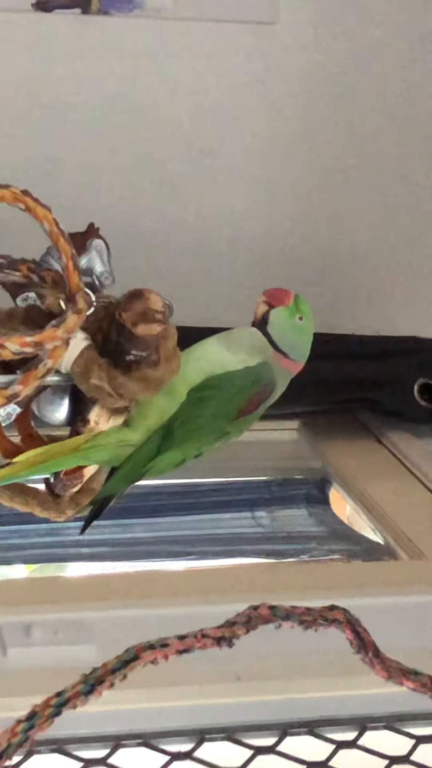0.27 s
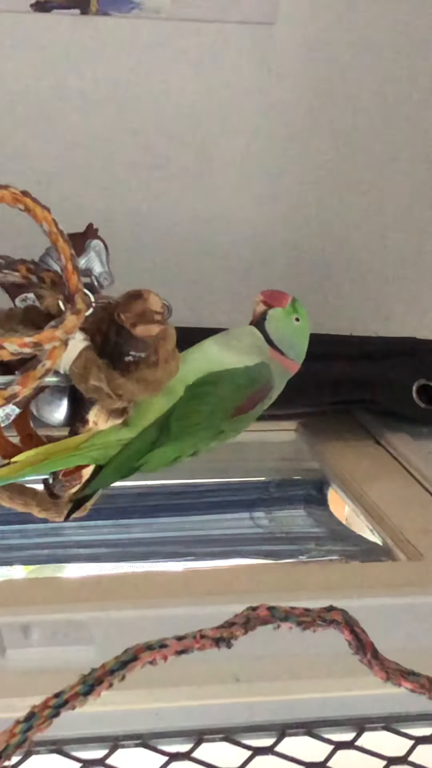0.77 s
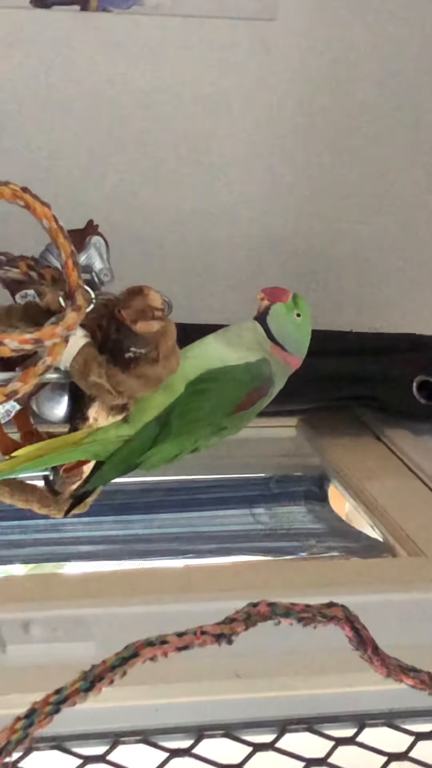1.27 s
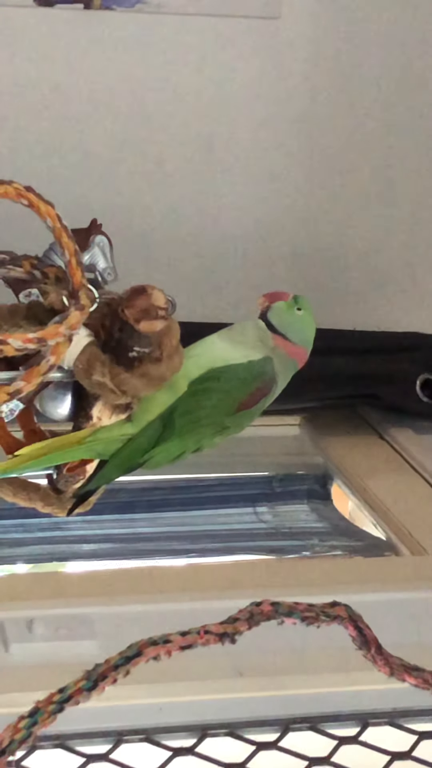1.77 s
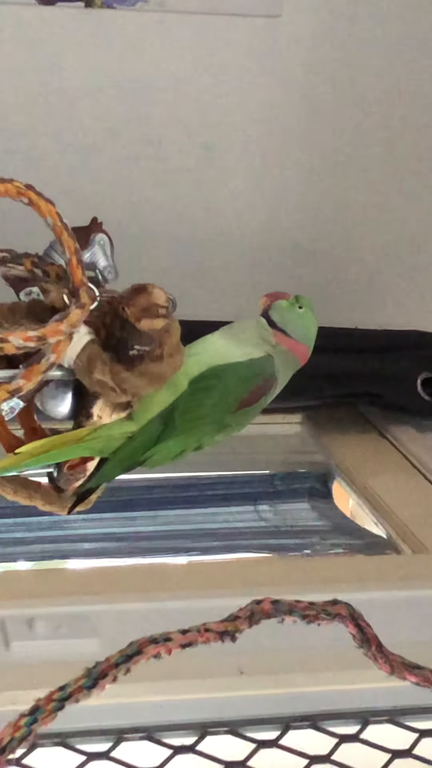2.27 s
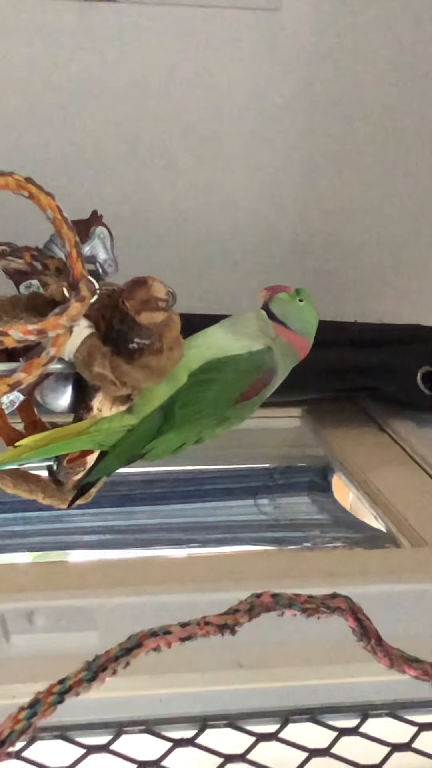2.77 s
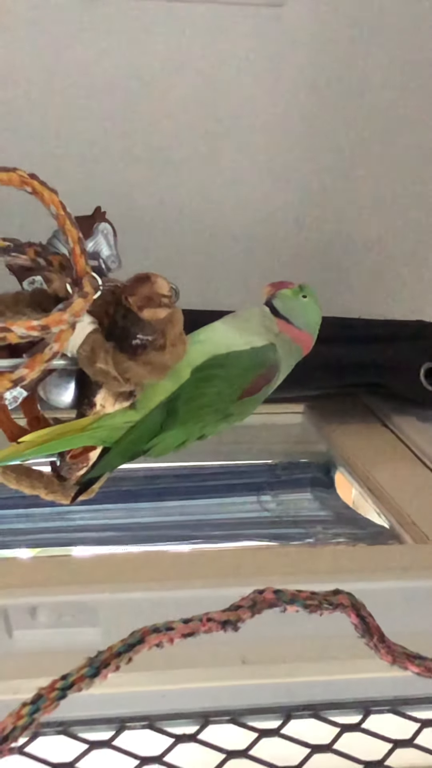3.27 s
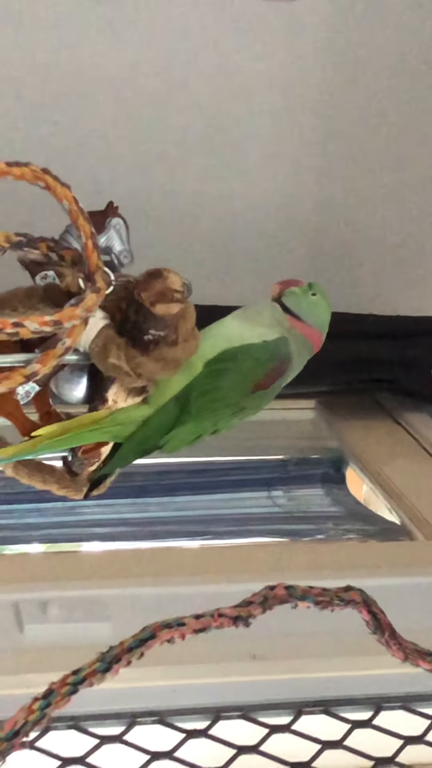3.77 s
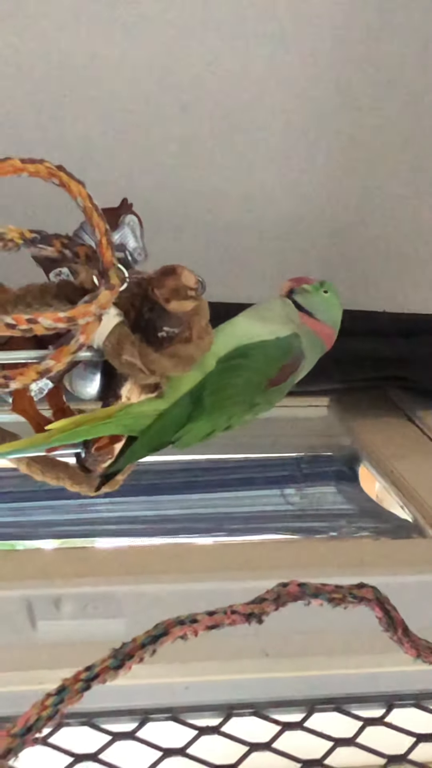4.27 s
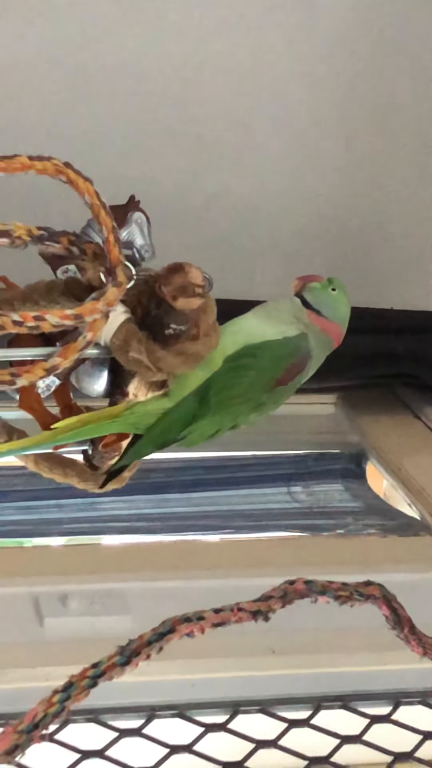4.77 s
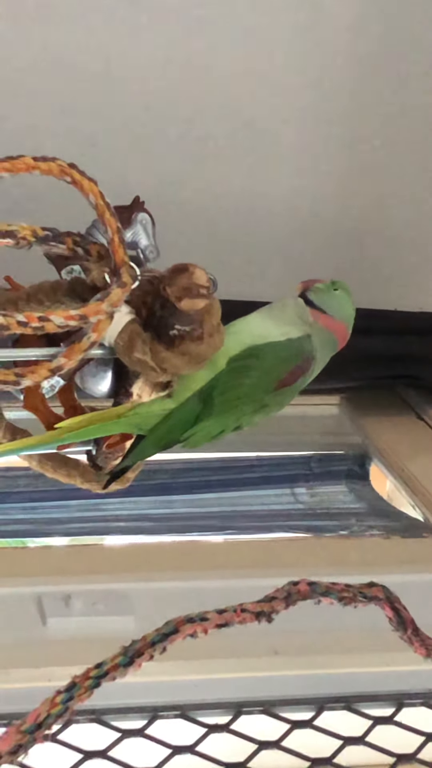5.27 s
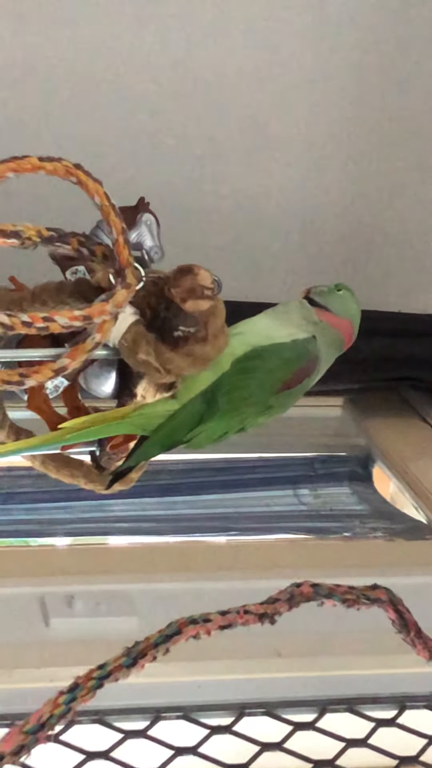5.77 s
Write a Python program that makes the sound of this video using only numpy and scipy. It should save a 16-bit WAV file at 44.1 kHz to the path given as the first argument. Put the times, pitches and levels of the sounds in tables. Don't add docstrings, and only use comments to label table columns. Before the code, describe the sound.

A small, quiet furnished room with soft low room tone, faint hiss and a distant traffic rumble that slowly recedes. At about 0.4 seconds a parakeet near the microphone gives a loud, clear whistle: it leaps quickly from low to high, arches over, falls, then settles on a steady, slightly buzzing, uneven note until about 0.7. Soft reflections die away within half a second. Near-silence follows, with barely perceptible far-off bird calls around 2.7 to 3.7. At about 3.75 a very short high peep drops straight into a piercing screech. It holds a fluttering nasal note, catches briefly, then around 4.05 breaks into a bright, rough, chaotic rasp, sagging in pitch, dulling and weakening until it ends near 4.5. Its short room tail fades. Quiet room tone remains to the end at about 6 seconds, with a few extremely faint, blurred outdoor birds after 4.9.

```python
import sys
import numpy as np
from scipy import signal
from scipy.fft import rfft, irfft, next_fast_len
from scipy.io import wavfile
from scipy.ndimage import uniform_filter1d

SR = 44100
rng = np.random.default_rng(int(sys.argv[2]) if len(sys.argv) > 2 else 0)


def field_ratio(decibels):
    return 10 ** (np.asarray(decibels, dtype=float) / 20)


def to_wav(sig):
    pcm = np.clip(np.atleast_2d(sig), -1, 1) * 32767
    pcm = np.round(pcm).astype(np.int16)
    wavfile.write(sys.argv[1], SR, pcm.T)


N = 265878


def at_hz(points, hz):
    point_hz, value = np.transpose(points)
    return np.interp(np.log(np.maximum(hz, 1)), np.log(point_hz), value)


def rms_one(x):
    return x / np.sqrt(np.mean(x ** 2) + 1e-20)


def wander(size, rate_hz):
    r = np.exp(-2 * np.pi * rate_hz / SR)
    drift = signal.lfilter([1], [1, -2 * r, r * r], rng.standard_normal(size + 2000))
    return rms_one(drift[2000:])


def coloured(x, spectrum):
    size = next_fast_len(len(x))
    hz = np.arange(size // 2 + 1) * SR / size
    return irfft(rfft(x, size) * field_ratio(at_hz(spectrum, hz)), size)[:len(x)]


def parakeet():
    # (time [s], pitch [Hz], effort [dB])
    whistle_path = [
        (.372, 907, -20.5),
        (.382, 1375, -21),
        (.417, 2142, -13),
        (.432, 2300, -12),
        (.452, 2318, -11.5),
        (.482, 1528, -14),
        (.51, 1432, -17),
        (.56, 1608, -13),
        (.678, 1651, -15.5),
    ]
    peep_path = [
        (3.762, 2880, -29),
        (3.787, 2850, -10.5),
        (3.796, 2760, -17),
    ]
    screech_path = [
        (3.794, 2120, -12.5),
        (3.81, 1730, -12),
        (3.826, 1584, -11.5),
        (3.865, 1583, -16),
        (3.99, 1664, -16),
        (4.07, 1654, -18),
        (4.19, 1564, -20.5),
        (4.4, 1154, -27),
        (4.492, 891, -32),
    ]
    never = N / SR
    whistle = gesture(whistle_path, settle_s=0.45, break_s=never, notch_hz=6980, flutter_hz=395,
                      tire_hz_per_s=0, widen_hz_per_s=0, tilt_db=-3.0, haze=.012)
    peep = gesture(peep_path, settle_s=never, break_s=never, notch_hz=7200, flutter_hz=384,
                   tire_hz_per_s=0, widen_hz_per_s=0, tilt_db=-8, haze=.14)
    screech = gesture(screech_path, settle_s=3.862, break_s=4.04, notch_hz=6470, flutter_hz=435.2,
                      tire_hz_per_s=260, widen_hz_per_s=150, tilt_db=-2.37, haze=.005)
    return (note(whistle, rise_s=.004)
            + note(peep, rise_s=.007, fall_s=.004)
            + note(screech, inertia_s=.005, rise_s=0.001))


def gesture(rows, settle_s, break_s, notch_hz, flutter_hz, tire_hz_per_s, widen_hz_per_s, tilt_db, haze):
    # (time [s], change [dB], half width [s])
    catches = [
        (.522, -6.5, .02),
        (.572, 1, .015),
        (0.631, -3, 0.01),
        (.652, 5, .012),
        (3.89, 3, .015),
        (3.94, -12, 0.006),
        (3.954, 6, 0.0073),
        (4.042, -7, 0.014),
        (4.06, 5.5, .012),
    ]
    s, hz, effort_db = np.transpose(rows)
    t = np.linspace(s[0], s[-1], num=400)
    hz, effort_db = np.interp(t, s, hz), np.interp(t, s, effort_db)
    for at, db, width in catches:
        effort_db = effort_db + db * np.exp(-((t - at) / width) ** 2)

    glide = uniform_filter1d(np.abs(np.gradient(np.log(hz), t)), size=12, mode="nearest")
    glide = np.minimum(glide, 19)
    warm = np.clip((t - s[0]) / .04, 0, 1)

    settled_notch_hz, loose_swing_hz, settled_swing_hz = 5450, 10, 34
    settled = np.clip((t - settle_s) / .025, 0, 1)
    widening_hz = settled_swing_hz - loose_swing_hz + widen_hz_per_s * (t - settle_s)
    swing_hz = loose_swing_hz + settled * widening_hz

    chaos_jump, chaos_per_s, swing_hz_per_chaos, swing_share = 0.11, 0.88, 880, .24
    since_break = t - break_s
    broken = np.clip(since_break / .06, 0, 1)
    strain = broken * (chaos_jump + chaos_per_s * since_break)
    swing_hz = np.minimum(swing_hz + swing_hz_per_chaos * strain, swing_share * hz)

    gape_s, close_s, broken_notch_hz, closed_notch_hz = .23, .06, 8860, 3350
    closing = np.clip((since_break - gape_s) / close_s, 0, 1)
    gape_hz = broken_notch_hz + closing * (closed_notch_hz - broken_notch_hz)
    beak_hz = notch_hz + settled * (settled_notch_hz - notch_hz) + broken * (gape_hz - settled_notch_hz)

    break_tilt_db, dulling_db_per_s = 2.03, 9
    tilt = tilt_db + 0.25 * glide * warm + broken * (break_tilt_db - dulling_db_per_s * since_break)
    chaos = haze + .036 * settled + .007 * glide + strain
    tiring_flutter_hz = flutter_hz - tire_hz_per_s * (t - s[0])
    return np.transpose([t, hz, effort_db, tiring_flutter_hz, swing_hz, tilt, beak_hz, chaos])


def note(rows, inertia_s=.008, rise_s=0.001, fall_s=0.0041):
    # (frequency [Hz], level [dB])
    throat = [(560, -28.5), (780, -17), (1600, -15.5), (2300, -8.5), (2850, -3.5), (3300, 0.5), (3700, 0.5),
              (4150, -9), (4650, -6.5), (6200, -3.5), (7200, -10), (8300, -12.5), (10500, -20),
              (15000, -13.5)]
    s, *columns = np.transpose(rows)
    t = np.arange(s[0], s[-1], 1 / SR)
    hz, effort_db, flutter_hz, swing_hz, tilt_db, notch_hz, chaos = [np.interp(t, s, c) for c in columns]
    hz = uniform_filter1d(hz, max(int(inertia_s * SR), 1), mode="nearest")
    chaos = np.clip(chaos, 0, 1)

    flutter = 2 * np.pi * np.cumsum(flutter_hz * (1 + 0.12 * chaos * wander(len(t), 60))) / SR
    halved = np.clip((chaos - .04) / .08, 0, 1)
    slow_flutter = np.sin(flutter / 2) + .15 * np.cos(flutter)
    shake = (1 - halved) * np.sin(flutter) + halved * slow_flutter
    uneven_swing_hz = swing_hz * shake * (1 + .2 * chaos * wander(len(t), 80))
    jitter_hz = (1.5 + 90 * chaos) * wander(len(t), 500)
    hz = hz + uneven_swing_hz + jitter_hz

    phase = 2 * np.pi * np.cumsum(hz) / SR
    k = np.arange(1, 21)[:, None]
    audible = np.clip((17500 - k * hz) / 1000, 0, 1)
    notch = 1 - .9 * np.exp(-((k * hz - notch_hz) / 400) ** 2)
    tone = np.sum(audible * notch * field_ratio(tilt_db * np.log2(k)) * np.sin(k * phase), axis=0)
    throb = 1 - (1 - halved) * swing_hz / 1300 * shake
    breath = field_ratio(-37.5 + 32 * chaos) * (1 + np.cos(phase)) * rng.standard_normal(len(t))
    voice = coloured(tone * throb + signal.lfilter([1, -.9], [1], breath), throat)

    voice = voice / np.sqrt(uniform_filter1d(voice ** 2, size=1200, mode="nearest") + 1e-9)
    edges = np.clip(np.minimum((t - t[0]) / rise_s, (t[-1] - t) / fall_s), 0, 1)
    out, start = np.zeros(N), round(s[0] * SR)
    out[start:start + len(t)] = voice * edges * field_ratio(effort_db)
    return out


def room(x, gap_s=0.0033, build_s=0.0029):
    # (frequency [Hz], decay time [s])
    decay_times = [(600, 0.44), (1600, 0.42), (2400, 0.44), (3300, 0.44), (4900, 0.33), (6400, .35),
                   (9000, .31), (14000, 0.17)]
    t = np.arange(40000) / SR
    white = rfft(rng.standard_normal(len(t)))
    octave = np.log2(np.arange(20001) * SR / 40000 + 1)
    echo = np.zeros(len(t))
    for centre in np.arange(8.5, 14.6, .25):
        band = irfft(white * np.clip(1 - 4 * np.abs(octave - centre), 0, 1), len(t))
        echo += band * field_ratio(-60 * t / at_hz(decay_times, 2 ** centre))
    echo = echo * np.clip((t - gap_s) / build_s, 0, 1)
    return signal.fftconvolve(x, echo / np.sqrt(np.sum(echo ** 2)))[:N]


def far_birds():
    # (time [s], length [s], pitch [Hz], width [Hz], level [dB])
    distant_calls = [(4.92, .24, 3150, 300, -74), (4.95, .21, 6400, 400, -77), (4.88, .22, 4450, 900, -75),
                     (5.72, .1, 2050, 40, -79), (5.43, .2, 770, 30, -72), (5.85, .18, 3600, 200, -79),
                     (3.25, .25, 3100, 500, -79), (3.55, .15, 2250, 120, -77), (2.7, .12, 1600, 700, -74),
                     (3.735, .03, 2900, 300, -70), (3.5, .06, 5700, 700, -78)]
    out = np.zeros(N)
    for s, length, hz, width_hz, level_db in distant_calls:
        start = round(s * SR)
        size = min(round(length * SR), N - start)
        edges = [hz - width_hz / 2, hz + width_hz / 2]
        resonance = signal.butter(2, edges, "band", fs=SR, output="sos")
        call = rms_one(signal.sosfilt(resonance, rng.standard_normal(12000)))
        out[start:start + size] += field_ratio(level_db) * call[-size:] * np.sqrt(np.hanning(size))
    return out


def hush():
    # (frequency [Hz], level [dB per Hz])
    room_tone = [(15, -37.5), (25, -8), (53, -3.5), (86, -2.5), (137, 0), (235, -4), (276, -2.5), (316, -5),
                 (414, -6.5), (500, -9.5), (769, -13.5), (834, -14), (1590, -21.5), (2330, -27),
                 (15800, -41.5)]
    steady = field_ratio(-59.5) * rms_one(coloured(rng.standard_normal(N), room_tone))
    hiss = field_ratio(-85.5) * signal.lfilter([1, -1], [1], rng.standard_normal(N))

    rumble_db, fade_db_per_s, swell_db = -67.5, 1, 2
    rumble_band = signal.butter(2, [36, 58], "band", fs=SR, output="sos")
    rumble = rms_one(signal.sosfilt(rumble_band, rng.standard_normal(N)))
    traffic_db = rumble_db - fade_db_per_s * np.arange(N) / SR + swell_db * wander(N, 8)
    return steady + hiss + field_ratio(traffic_db) * rumble


def scene():
    # (frequency [Hz], level [dB])
    facing = [(5000, -1.5), (8500, -0.5), (10500, -11), (16000, -9.5)]
    bird = field_ratio(-0.5) * parakeet()
    direct = coloured(bird, facing)
    reflections = field_ratio(-4.5) * room(bird)
    return (direct + reflections + far_birds() + hush())[None]


def low_pass(x):
    return signal.sosfilt(signal.butter(12, 15940, fs=SR, output="sos"), x)


def record(dry):
    cutoff_hz, bass_cut_hz = 16300, 39
    cut = signal.sosfilt(signal.cheby2(12, 70, cutoff_hz, fs=SR, output="sos"), dry)
    cut = signal.sosfilt(signal.butter(6, bass_cut_hz, "high", fs=SR, output="sos"), cut)
    return low_pass(cut)


dry = scene()
out = record(dry)
to_wav(out)
```